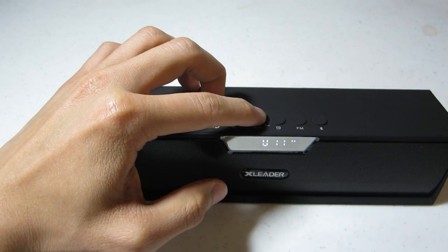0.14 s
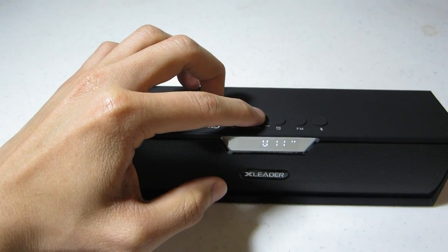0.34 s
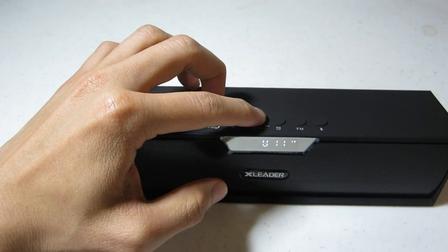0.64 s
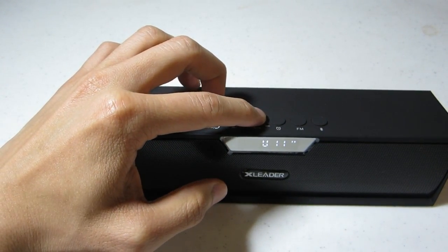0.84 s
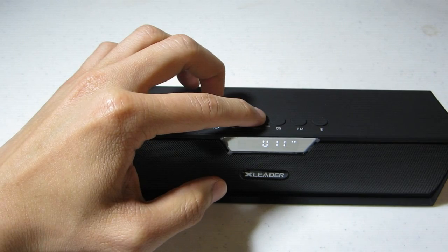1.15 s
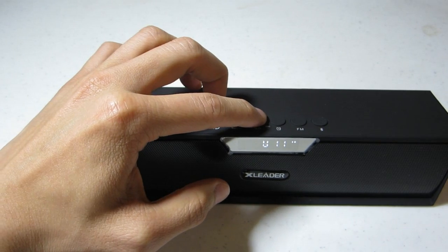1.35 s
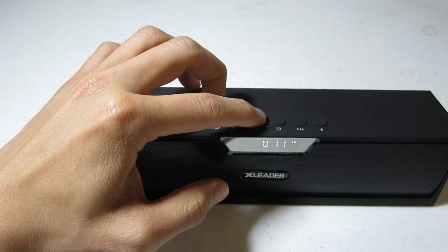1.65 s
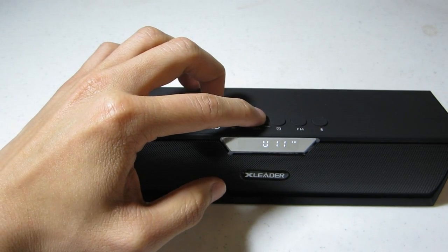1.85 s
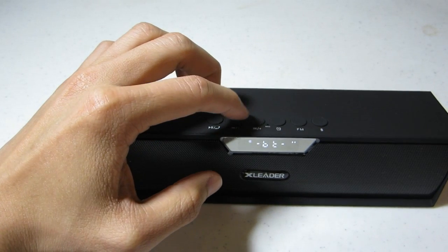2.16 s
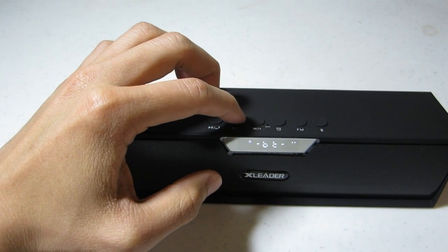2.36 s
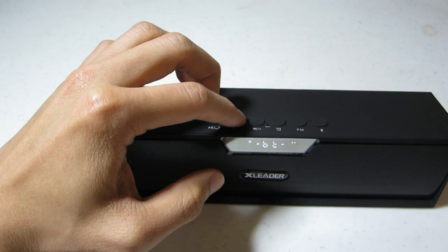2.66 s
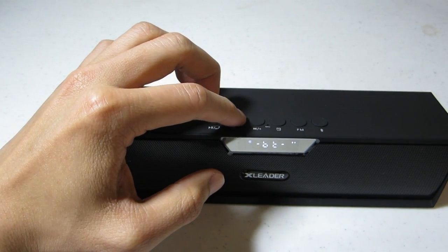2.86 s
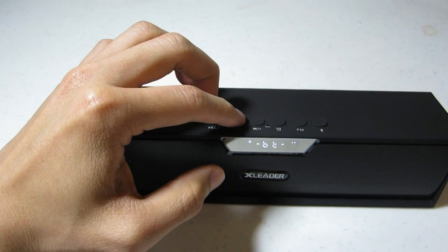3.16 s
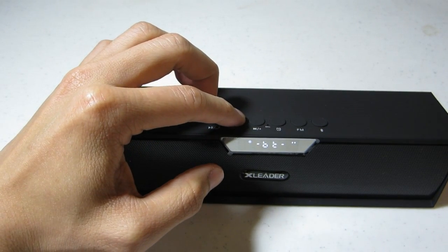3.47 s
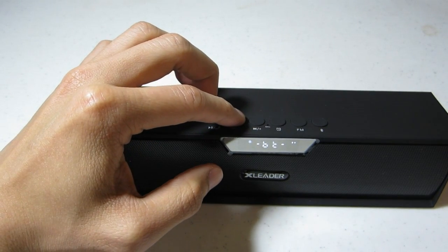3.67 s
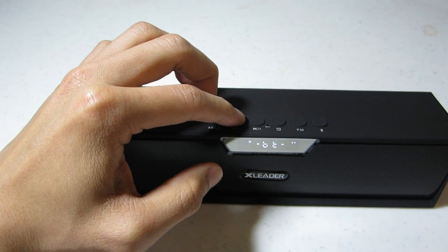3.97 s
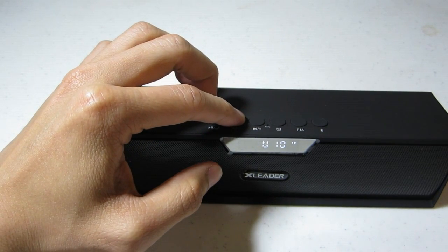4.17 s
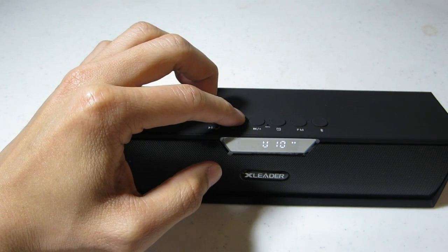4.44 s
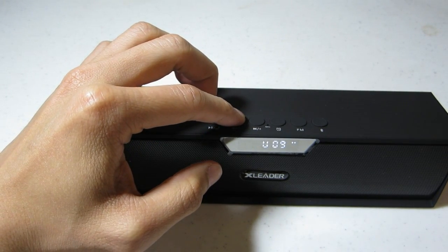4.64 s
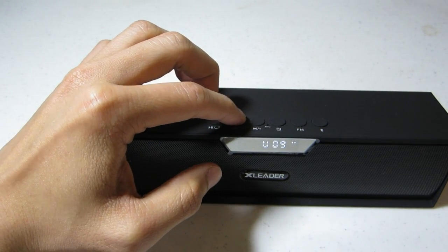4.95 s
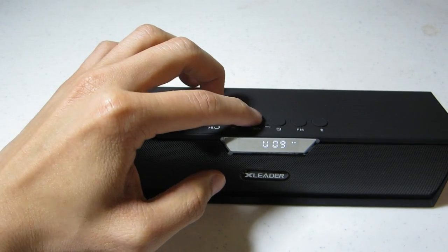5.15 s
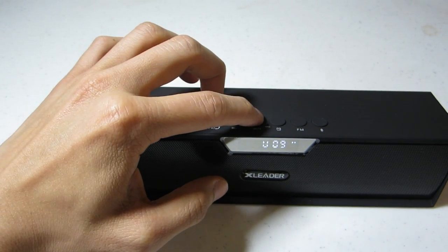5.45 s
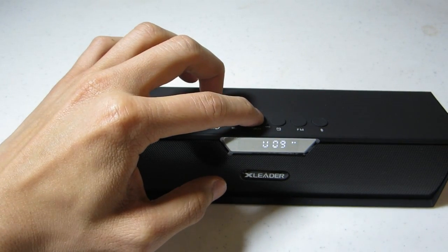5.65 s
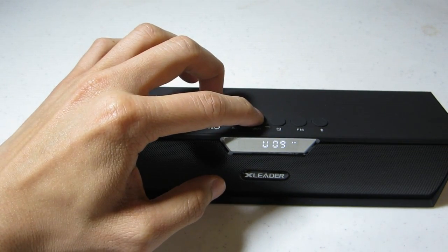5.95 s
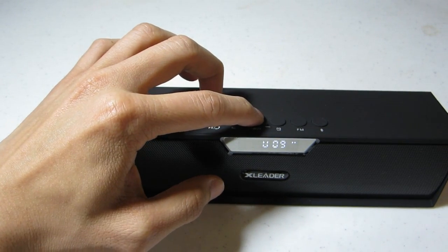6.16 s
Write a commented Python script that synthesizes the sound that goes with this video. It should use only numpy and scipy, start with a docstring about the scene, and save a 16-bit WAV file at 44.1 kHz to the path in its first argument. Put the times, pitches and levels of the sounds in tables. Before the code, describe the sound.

A finger works two small push buttons on a plastic loudspeaker lying on a table. Each press gives a bright, sharp click and each release a duller one, with a slight thump from the case. Ten clicks come unevenly, some in quick pairs, with a pause before the last two and a soft rattle between those. A few thin fingertip ticks end it. The sound is close, in a quiet room with faint hum and hiss.

```python
"""Two small push buttons click under a finger on a plastic loudspeaker, on a table in a quiet room.
Each switch dome snaps down with a bright click and springs back with a dull one; both impulses excite
the modes of the same shell and rock it on its feet. Once the finger lands on a loose cap with a soft
rattle; at the end it slips across the cap with a few thin ticks. Behind the clicks and their short
echo the room rumbles and hums faintly, the microphone hisses and the electronics whine."""
import sys
import numpy as np
from scipy import signal
from scipy.fft import rfft, irfft
from scipy.io import wavfile

SR = 44100
rng = np.random.default_rng(int(sys.argv[2]) if len(sys.argv) > 2 else 0)


def digitize_waveform(pressure):
    """Quantize a signal to 16-bit integers and store it at the path in sys.argv[1].

    Rows of a 2-D input are taken as channels; values are limited to [-1, 1].
    """
    field = np.atleast_2d(pressure).T
    bounded = np.clip(field, -1, 1)
    quanta = np.round(bounded * 32767).astype(np.int16)
    wavfile.write(sys.argv[1], SR, quanta)


N = 278266

RIGHT_UP, RIGHT_DOWN, LEFT_UP, LEFT_DOWN = range(4)  # the strokes of the two buttons
# Modes of the shell. Each row: frequency in Hz, t60 in seconds, then relative level in dB for each
# of the four strokes in the order above.
SHELL_MODES = [(670, 0.043, -44, -43, -39, -45), (840, 0.02, -26.5, -33.5, -30, -53),
               (939, 0.039, -28.5, -33.0, -26.5, -41), (991, 0.051, -28.0, -31.0, -24.5, -28.0),
               (1239, 0.027, -17.5, -23.0, -27, -27.5), (1338, 0.023, -10.5, -15.0, -18.0, -20.5),
               (1554, 0.024, -13.0, -14.5, -23.5, -29.5), (1653, 0.032, -19.5, -22.5, -27, -31.5),
               (1830, 0.027, -26.0, -28, -36, -34.5), (2060, 0.021, -21.0, -24, -28.0, -23.0),
               (2403, 0.033, -24.0, -23.5, -29, -26), (2560, 0.032, -32, -27.5, -41, -35.0),
               (2708, 0.02, -22.5, -20.5, -27.5, -18.5), (3076, 0.019, -31, -24, -33.5, -24.5),
               (3396, 0.025, -39, -25.5, -29.5, -21.5), (3750, 0.012, -33, -13.5, -24.0, -15.0),
               (3960, 0.026, -33, -23.5, -30, -19), (4090, 0.021, -31.5, -19.0, -28, -22.5),
               (4640, 0.013, -28, -15.5, -35, -15), (5180, 0.022, -33, -23, -51, -27),
               (5446, 0.025, -36, -23.5, -41, -21.5), (5910, 0.017, -37, -24.5, -37, -20.5),
               (6480, 0.016, -46, -21.5, -54, -18.5), (6880, 0.017, -52.0, -23.5, -56.0, -36.0),
               (7420, 0.0078, -27.0, -16, -61, -54), (7890, 0.018, -34, -25, -53, -24.5),
               (8430, 0.01, -31, -18.5, -59, -49.0), (9300, 0.011, -52.0, -29, -36, -21.0),
               (9730, 0.014, -34, -20.5, -48, -56), (10550, 0.013, -45, -42, -50, -33)]
# Snaps of the domes. Each row: start in seconds, stroke, gain of the ring in dB, crack level in dB.
DOME_SNAPS = [(0.2890, RIGHT_UP, -0.5, -31), (0.4929, RIGHT_DOWN, 0.24, -28), (1.1688, RIGHT_UP, 0.3, -37),
              (1.3053, RIGHT_DOWN, 0.25, -27), (1.901, RIGHT_UP, -0.46, -36.5),
              (2.7089, LEFT_DOWN, 0, -29.5), (2.9205, LEFT_UP, -1.6, -34), (3.0902, LEFT_DOWN, -0.8, -30),
              (4.9866, LEFT_UP, 1, -32.5), (5.2338, RIGHT_DOWN, -0.4, -24.5)]
# Spectrum of a dome's crack. Each row: frequency in Hz, relative level in dB.
CRACK_SPECTRUM = [(1000, -11), (2000, -8), (4500, -3.5), (7000, -2), (10000, -0.5), (12500, -1),
                  (14500, -16), (16000, -26)]
# Spectrum of a fingertip's tick. Each row: frequency in Hz, relative level in dB.
TICK_SPECTRUM = [(1500, -16), (3500, -17), (5200, 0.5), (8000, -1), (11000, -10), (16000, -18)]
# Reverberation time of the room. Each row: frequency in Hz, t60 in seconds.
ECHO_T60 = [(300, 0.19), (1100, 0.18), (1300, 0.39), (1480, 0.29), (2000, 0.25), (3000, 0.2447),
            (4500, 0.23), (6500, 0.1844), (10000, 0.13), (16000, 0.06)]
# Spectrum of the room's echo. Each row: frequency in Hz, relative level in dB.
ECHO_SPECTRUM = [(200, 6), (700, 8.5), (1000, 3), (1160, -4), (1300, 3), (1450, -3.5), (1600, 1),
                 (2000, -5.5), (2650, -1), (3200, -5.5), (4800, -1.5), (8000, -2), (12000, -3.5),
                 (15000, -12.5)]
# Spectrum of room rumble and microphone hiss. Each row: frequency in Hz, relative level in dB.
FLOOR_SPECTRUM = [(12, -11.5), (22, -0.5), (35, -1), (52, 1), (70, -5), (125, 0.5), (160, -4.5), (400, -8),
                  (510, -9), (1000, -13), (2500, -19), (8000, -24), (13000, -29.5), (16000, -36.5)]
# Slow drift of that rumble and hiss. Each row: time in seconds, level in dB.
FLOOR_LEVEL = [(0, -58.5), (2.2, -58), (3.5, -59.5), (4.6, -57.5), (6.31, -58)]
# Wavering hum of the room. Each row: centre frequency in Hz, bandwidth in Hz, level in dB.
HUM_BANDS = [(53.4, 12, -64.5), (100.2, 10, -67)]
# Thin whine of the electronics. Each row: frequency in Hz, level in dB.
WHINE_TONES = [(7792, -95), (7852, -83.5), (7882, -84.5), (8002, -93), (13050, -93)]

LANDING_S, SLIP_START_S, SLIP_END_S = 5.1226, 6.1994, 6.2219
# Jolts of the case. Each pair: gain of the rocking in dB, gain of the table top in dB.
PRESS_JOLT_DB, RELEASE_JOLT_DB = (-49.5, -49.5), (-44, -44)
LANDING_JOLT_DB, SLIP_JOLT_DB = (-39.5, -50), (-46, -43.5)


def buttons(crack_t60=0.018, radiate_hz=500):
    """Impact excitation: a dome cracks and the shell rings. Returns direct and wall-bound sound."""
    direct, spread = np.zeros(N), np.zeros(N)
    radiation = signal.butter(2, radiate_hz, "high", fs=SR, output="sos")  # small shell, little bass
    for s, stroke, strength_db, crack_db, contact_hz in contacts():
        ring = signal.sosfilt(radiation, shell_ring(stroke))
        softness = np.exp(-2 * np.pi * contact_hz / SR)  # a soft contact leaves the high modes quiet
        ring = signal.lfilter([1 - softness], [1, -softness], ring)
        click = from_db(strength_db) * ring + from_db(crack_db) * burst(CRACK_SPECTRUM, crack_t60)
        add(direct, s, click)
        add(spread, s, toward_walls(click))
    return direct, spread


def contacts(snap_hz=20000, landing_hz=3180, landing_db=-25.5, cap_rock_s=.0024):
    """Hardness sets bandwidth: domes snap hard; the loose cap lands softly on one edge, then the other."""
    snaps = [(*snap, snap_hz) for snap in DOME_SNAPS]
    rattle = [(LANDING_S + k * cap_rock_s, stroke, landing_db, -np.inf, landing_hz)  # no crack
              for k, stroke in enumerate((LEFT_DOWN, RIGHT_UP))]
    return snaps + rattle


def shell_ring(stroke, spread_db=1.0, detune=0.0017, size=4096):
    """Modal superposition: the shell rings in damped sines, varied a little by the grip of the hand."""
    t, modes = np.arange(size) / SR, np.array(SHELL_MODES)
    pitch_scatter, level_scatter = rng.standard_normal((2, len(modes)))
    hz = modes[:, 0] * (1 + detune * pitch_scatter)
    gains = from_db(modes[:, 2 + stroke] + spread_db * level_scatter)
    signs = (-1) ** np.arange(len(modes))  # neighbours start in opposition, so the ring swells briefly
    damped_sines = np.sin(2 * np.pi * hz[:, None] * t) * fade(t, modes[:, 1:2])
    return (gains * signs) @ damped_sines


def thumps(feet_hz=84, feet_t60=0.22, table_hz=(122, 170), table_t60=0.22, rise_s=0.00066, size=16384):
    """Mass on a spring: each jolt rocks the case on its rubber feet and shakes the table."""
    out, t = np.zeros(N), np.arange(size) / SR
    rocking = np.sin(2 * np.pi * feet_hz * t) * fade(t, feet_t60)
    table = np.mean([np.sin(2 * np.pi * hz * t) for hz in table_hz], axis=0) * fade(t, table_t60)
    onset = 1 - np.exp(-t / rise_s)
    for s, rocking_db, table_db in jolts():
        add(out, s, (from_db(rocking_db) * rocking - from_db(table_db) * table) * onset)
    return out


def jolts(pad_lag_s=0.0057, settle_s=0.0403, settle_loss_db=6):
    """Momentum transfer: each move jolts the case, a release more than a press, which steadies it."""
    snaps = [(s, *(PRESS_JOLT_DB if stroke in (RIGHT_DOWN, LEFT_DOWN) else RELEASE_JOLT_DB))
             for s, stroke, *_ in DOME_SNAPS]
    landing = (LANDING_S + pad_lag_s, *LANDING_JOLT_DB)
    settling = (LANDING_S + pad_lag_s + settle_s, *(db - settle_loss_db for db in LANDING_JOLT_DB))
    slip = (SLIP_START_S + pad_lag_s, *SLIP_JOLT_DB)
    return snaps + [landing, settling, slip]


def fingertip(break_db=-45, stutter_db=-50, flick_db=-34.5, t60=.011, uneven=.2, spread_db=1.0, steps=6):
    """Stick-slip friction: skin breaks loose, stutters and flicks off, too lightly to ring the shell."""
    out = np.zeros(N)
    step_s = (SLIP_END_S - SLIP_START_S) / steps
    stutter = [(SLIP_START_S + step_s * (k + uneven * later), stutter_db + spread_db * louder)
               for k, (later, louder) in enumerate(rng.standard_normal((steps - 1, 2)), 1)]
    for s, db in [(SLIP_START_S, break_db), *stutter, (SLIP_END_S, flick_db)]:
        add(out, s, from_db(db) * burst(TICK_SPECTRUM, t60))
    return out


def burst(spectrum, t60, size=4096):
    """Modal overlap: countless tiny high modes, struck at once, merge into a dying hiss."""
    return noise(spectrum, size) * fade(np.arange(size) / SR, t60)


def toward_walls(sound, blur=0.13, delay_s=.003):
    """Spatial averaging: summed over all directions, the shell's peaks and notches even out."""
    running_power = np.cumsum(np.abs(rfft(sound)) ** 2)
    bins = np.arange(len(running_power))
    reach = 1 + blur * bins
    upper = np.interp(bins + reach, bins, running_power)
    lower = np.interp(bins - reach, bins, running_power)
    mean_power = np.abs(upper - lower) / (2 * reach)
    pulse = irfft(np.sqrt(mean_power), len(sound))  # zero phase: centred on time zero
    return np.roll(pulse, int(delay_s * SR))


def room(x, wet_db=-17.2, first_echo_s=0.0016, build_s=0.0022, size=22050):
    """Reverberation: diffuse echoes build up within milliseconds; the treble dies first."""
    t, hz = np.arange(size) / SR, np.fft.rfftfreq(size, 1 / SR)
    coloured = rfft(rng.standard_normal(size)) * from_db(at_hz(ECHO_SPECTRUM, hz))
    centres, t60s = np.transpose(ECHO_T60)
    tail = 0
    for t60, pick in zip(t60s, np.eye(len(centres))):
        band = at_hz(np.c_[centres, pick], hz)  # 1 at this centre, 0 at its neighbours
        tail = tail + irfft(coloured * band, size) * fade(t, t60)
    tail *= 1 - np.exp(-np.maximum(t - first_echo_s, 0) / build_s)
    tail /= np.sqrt(np.sum(tail ** 2))
    return from_db(wet_db) * signal.fftconvolve(x, tail)[:N]


def background():
    """Noise floor: broadband rumble and hiss, a hum that wavers as narrowband noise does, a steady whine."""
    t, freqs = np.arange(N) / SR, np.fft.rfftfreq(N, 1 / SR)
    s, db = np.transpose(FLOOR_LEVEL)
    out = from_db(np.interp(t, s, db)) * noise(FLOOR_SPECTRUM, N)
    for hz, width_hz, hum_db in HUM_BANDS:
        resonance = 1 / (1 + (2 * (freqs - hz) / width_hz) ** 2)
        hum = irfft(rfft(rng.standard_normal(N)) * resonance, N)
        out += from_db(hum_db) * rms_one(hum)
    for hz, whine_db in WHINE_TONES:
        out += from_db(whine_db) * np.sqrt(2) * np.sin(2 * np.pi * (hz * t + rng.random()))
    return out


def noise(spectrum, size):
    """Spectral shaping: white noise takes on a given colour, at rms 1."""
    gains = from_db(at_hz(spectrum, np.fft.rfftfreq(size, 1 / SR)))
    return rms_one(irfft(rfft(rng.standard_normal(size)) * gains, size))


def from_db(db):
    """Decibels to amplitude ratio."""
    return 10 ** (np.asarray(db) / 20)


def rms_one(x):
    """Normalisation to unit power."""
    return x / np.sqrt(np.mean(x ** 2) + 1e-20)


def at_hz(points, hz):
    """Interpolation along a log-frequency axis."""
    points = np.array(points)
    return np.interp(np.log(np.maximum(hz, 1)), np.log(points[:, 0]), points[:, 1])


def fade(t, t60):
    """Exponential decay, 60 dB down after t60 seconds."""
    return np.exp(-np.log(1000) * t / t60)


def add(out, s, sound):
    """Superposition: a sound joins the mix at s seconds."""
    start = int(round(s * SR))
    out[start:start + len(sound)] += sound[:N - start]


def scene():
    """Direct and diffuse fields: clicks, ticks and their echo sum with the thumps and the background."""
    direct, spread = buttons()
    ticks = fingertip()
    return (direct + ticks + room(spread + ticks) + thumps() + background())[None]


def record(dry, cutoff_hz=16000):
    """Band limiting: a steep low-pass filter removes the highest treble."""
    return signal.sosfilt(signal.ellip(10, .1, 80, cutoff_hz, fs=SR, output="sos"), dry)


dry = scene()
out = record(dry)
digitize_waveform(out)
```